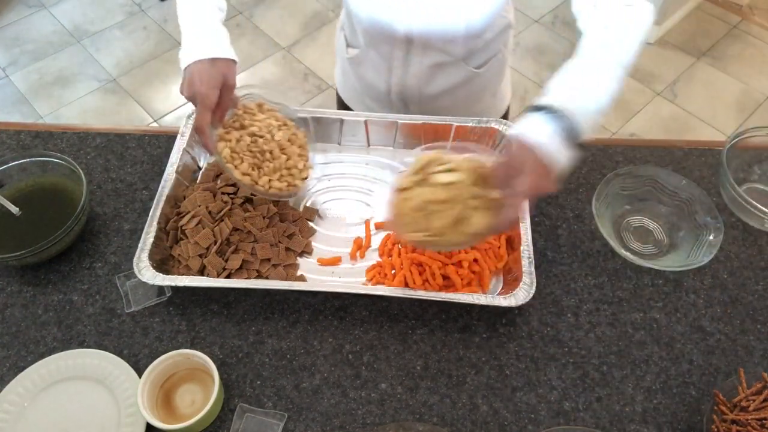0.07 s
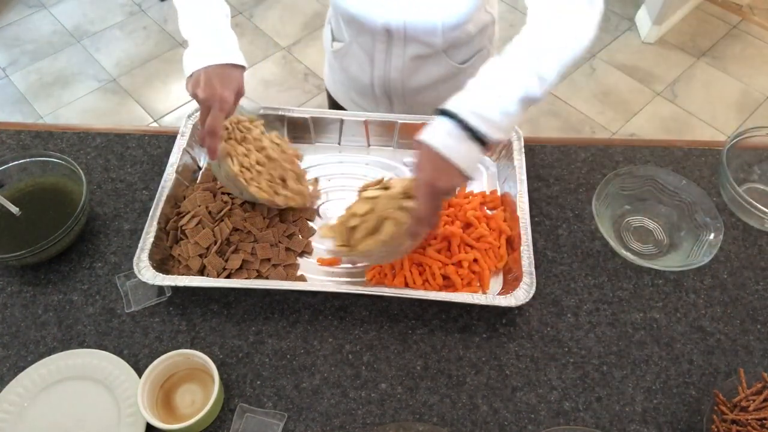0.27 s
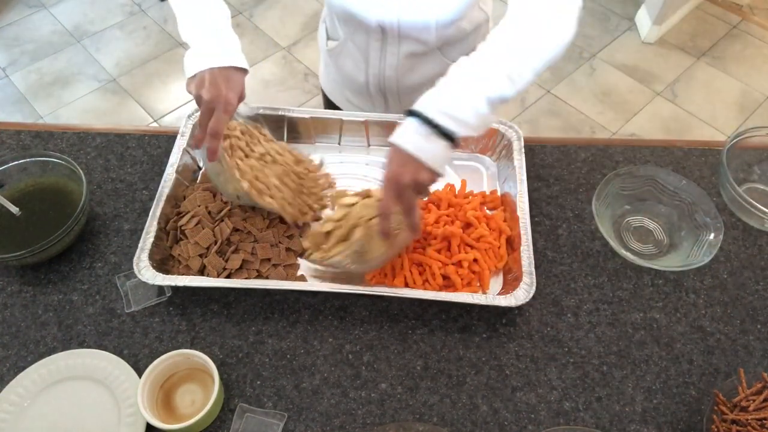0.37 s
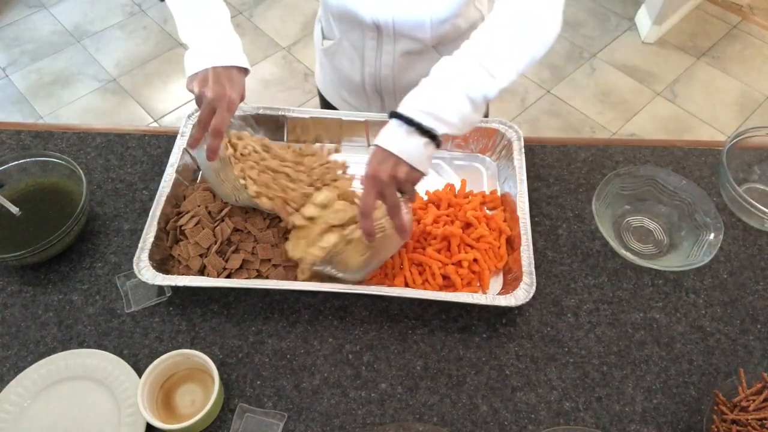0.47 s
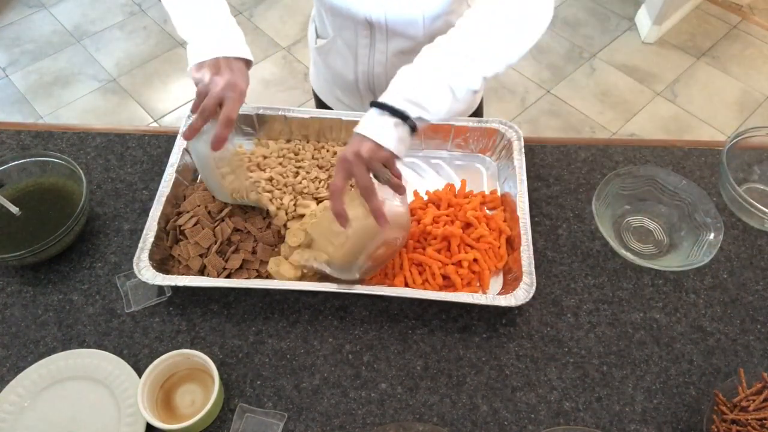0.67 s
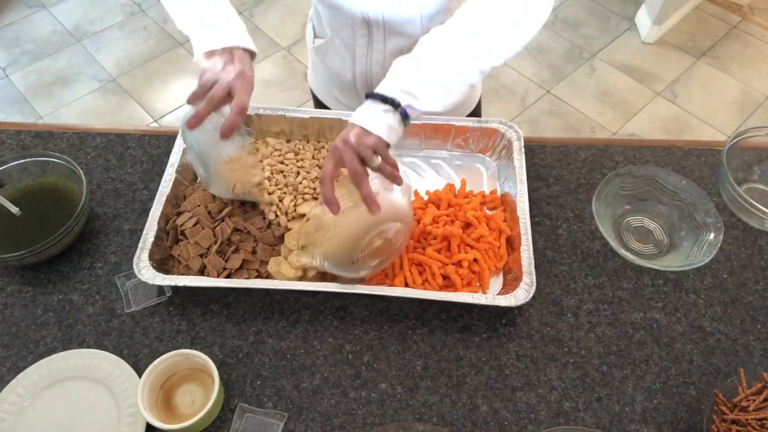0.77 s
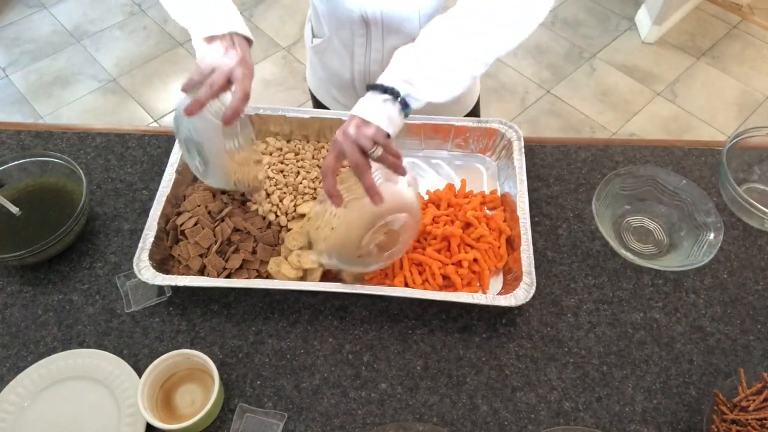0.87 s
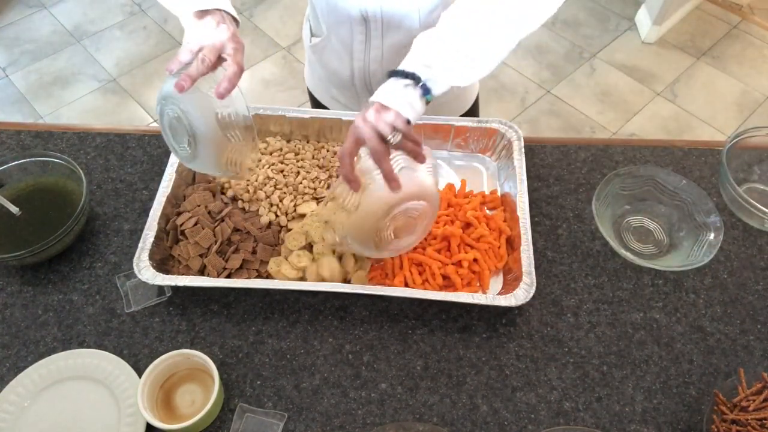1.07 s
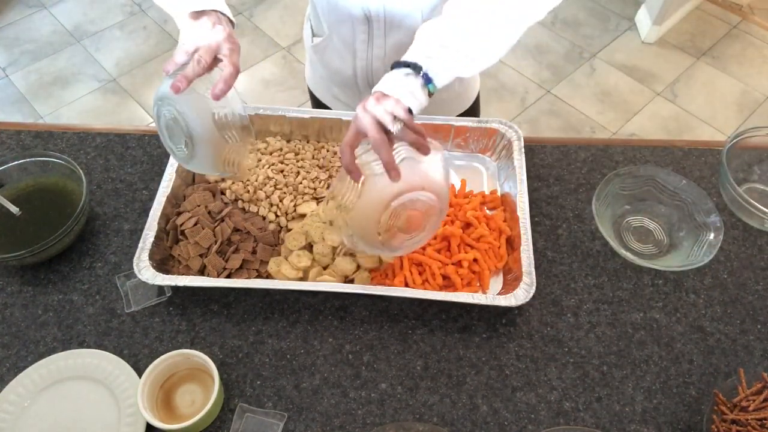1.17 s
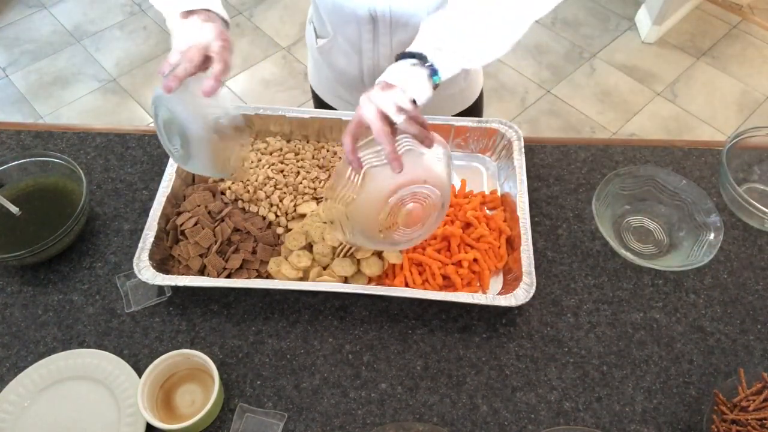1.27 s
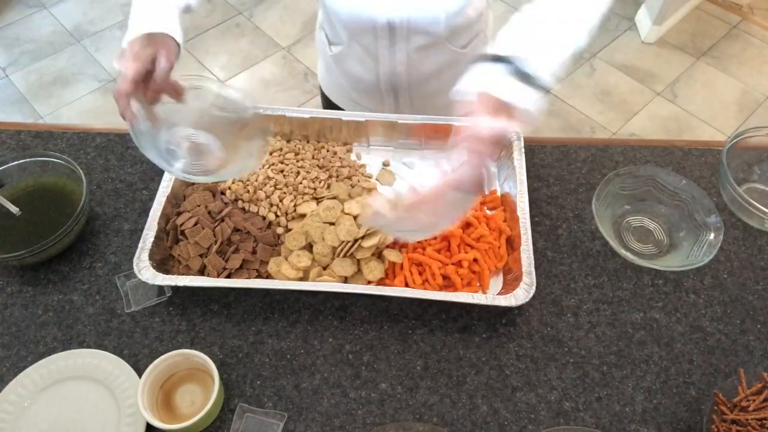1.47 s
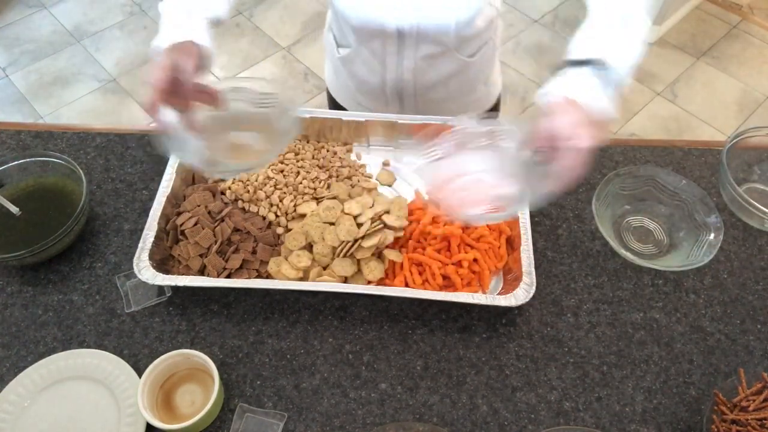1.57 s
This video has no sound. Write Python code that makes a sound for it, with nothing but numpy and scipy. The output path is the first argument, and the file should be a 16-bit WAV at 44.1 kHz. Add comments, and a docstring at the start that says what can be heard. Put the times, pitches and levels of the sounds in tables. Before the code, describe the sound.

Dry cereal and cracker pieces tick lightly on glass bowls, then dump in a loud, crackling rush into a foil pan, thinning to scattered knocks on the pile; close microphone in a hard-walled kitchen.

```python
"""Kitchen counter: dry snack pieces pour from glass bowls into a foil pan.
Pieces slide, knock and tick first: noise grains, short sine pairs and decaying glass modes.
The load crashes on foil, then thins out onto the pile: crackling noise bursts through foil, pile and
pan colours. Last lumps drop. Under it: puffs of treble crumbs, a low counter thrum,
a hard-walled kitchen's noise tails and a faint room hum."""
import sys
import numpy as np
from scipy import signal
from scipy.fft import rfft, irfft
from scipy.io import wavfile
from scipy.ndimage import uniform_filter1d

SR = 44100
rng = np.random.default_rng(int(sys.argv[2]) if len(sys.argv) > 2 else 0)


def wav_out(sig):
    """Save sig, one row per channel (or a flat mono array), as 16-bit PCM at SR to the path in sys.argv[1]."""
    wavfile.write(sys.argv[1], SR, np.round(np.clip(np.atleast_2d(sig).T, -1, 1) * 32767).astype(np.int16))


N = 70560

# room hum spectrum: [f/Hz, density/dB per Hz]
HUM_SPECTRUM = [(15, -41), (35, -29.5), (60, -6), (100, 1.3), (180, -13.5), (350, -9.5), (1170, -13),
                (2430, -24.5), (7390, -27), (16200, -34)]
# kitchen decay: [f/Hz, t60/s]
KITCHEN_DECAY = [(200, 0.14), (600, 0.95), (1400, 0.93), (3700, 0.63), (9700, 0.41), (16000, 0.33)]
# low counter modes: [f/Hz, width/Hz, level/dB]
COUNTER_MODES = [(65, 31, -6.5), (106, 12, 0.2), (151, 28, -6.5), (215, 95, -7)]
# pieces sliding in the tipped bowl: [t/s, level/dB]
SLIDE_LEVEL = [(0.038, -72.5), (.105, -68.5), (0.124, -53), (.165, -44), (0.201, -54)]
# crumbs, thin puffs of treble: [t/s, level/dB, centre f/Hz, t60/s]
CRUMB_PUFFS = [(0.0812, -44.5, 11400, 0.018), (.1216, -50, 12500, .012), (.1705, -50, 10460, .01),
               (0.6448, -31, 10930, 0.016), (0.671, -37, 10000, 0.0065), (1.2420, -62, 11100, .01),
               (1.2820, -52, 9800, .01), (1.426, -63.5, 10050, 0.01)]
# pieces ticking on the glass bowl: [t/s, level/dB, most excited f/Hz]
GLASS_TICKS = [(0.080, -50, 4020), (0.0875, -49.5, 4400), (0.1115, -31.5, 7040), (0.121, -34, 4880),
               (0.128, -29, 3620), (0.1408, -39, 6500), (0.1448, -34, 7330), (0.1535, -35, 5930),
               (0.1705, -37, 5520), (0.178, -37.5, 4410), (0.180, -31, 3000), (.195, -43.5, 5980)]
# bowl modes: [f/Hz, level/dB, t60/s]
GLASS_MODES = [(1540, -11, .02), (2610, -13, .022), (2960, -13, .022), (3015, -3, .034), (4370, -3, .026),
               (4415, 0, .03), (4510, -10, .022), (5230, -18, .03), (5900, -6, .034), (7320, -9, .022),
               (7390, -3, .024), (8400, -12, .036), (9020, -19, .022)]
# hard pieces knocking on each other: [t/s, level/dB, pitch f/Hz, t60/s]
CLACK_HITS = [(0.042, -61, 3960, .012), (.0722, -52, 3930, .006), (0.2033, -11.5, 3060, 0.012),
              (0.204, -22, 1490, 0.025), (.2255, -10.5, 2320, 0.016), (.2330, -11, 1520, 0.014),
              (0.258, -10.5, 1476, 0.03), (0.2632, -13, 3160, .012), (0.2734, -13.5, 2300, .012),
              (.313, -20, 3180, .012), (.3195, -15, 2310, 0.009), (.360, -12, 2210, 0.0096),
              (0.4212, -17, 2560, 0.017), (.4620, -13.5, 3600, .01), (.4765, -17, 3220, 0.0062),
              (0.5078, -13.5, 4124, 0.013), (0.5478, -23, 4096, 0.021), (0.6946, -27, 2670, 0.01),
              (0.713, -27, 2490, 0.0088), (0.749, -29, 2700, 0.0086), (0.758, -27.5, 4200, 0.012),
              (0.8457, -22.5, 1525, 0.014), (.9507, -27.5, 3720, 0.0062), (1.008, -26, 3700, 0.0056),
              (1.057, -32, 4470, 0.017), (1.1045, -26, 2330, 0.0075), (1.1305, -34.5, 5700, .012),
              (1.192, -31, 2094, 0.027), (1.193, -36, 1580, 0.037), (1.194, -38, 449, 0.057)]
# larger pieces landing: [t/s, level/dB, pitch f/Hz, treble/dB (flat at -20), t60/s]
DROP_HITS = [(0.201, -10.5, 1590, -21, 0.075), (0.213, -20, 1580, -6, 0.03),
             (0.225, -10, 2400, -20.5, 0.051), (0.235, -14, 1520, -30, 0.27),
             (0.274, -10, 2410, -9.5, 0.12), (0.289, -14, 3320, -36, 0.029),
             (0.295, -10.5, 2540, -21, 0.019), (0.314, -11.5, 3130, -29, 0.037),
             (0.329, -11, 1535, -27, 0.094), (0.346, -7.5, 1600, -21, 0.057),
             (0.36, -7.5, 1550, -11.5, 0.03), (0.384, -14, 2670, -13, 0.059),
             (0.419, -13, 2580, -18, 0.025), (0.435, -14, 2370, -22, 0.017),
             (0.461, -16, 3770, -17.5, 0.11), (0.475, -17, 960, -19, 0.083),
             (0.509, -23.5, 4250, -11, 0.049), (0.548, -17, 1880, -18.5, 0.17),
             (0.589, -19.5, 2150, -14, 0.071), (0.644, -27, 2030, -12, 0.028),
             (0.695, -19, 2800, -17.5, 0.035), (0.748, -21, 2770, -24, 0.04), (0.758, -24, 940, -19, 0.051),
             (0.845, -16.5, 1550, -23, 0.037), (0.852, -22.5, 990, -34, 0.037),
             (0.866, -25.5, 1880, -19, 0.06), (0.884, -19, 1120, -25.5, 0.041),
             (0.896, -27, 910, -29.5, 0.035), (0.92, -29.5, 880, -16.5, 0.073),
             (0.987, -24, 1200, -14, 0.075), (1.008, -29, 950, -25.5, 0.021), (1.047, -24, 960, -18, 0.073),
             (1.057, -21, 1140, -12.5, 0.1), (1.071, -23, 1510, -27, 0.075),
             (1.1043, -24.5, 2360, -17, 0.028), (1.13, -30, 1130, -18, 0.037),
             (1.191, -22, 2820, -16, 0.034), (1.1945, -22.5, 770, -30, 0.065),
             (1.217, -32, 774, -33, 0.057), (1.242, -40, 929, -7, 0.035), (1.287, -36, 855, -47, 0.049)]
# stream of small pieces: [t/s, level/dB, treble lift/dB, share on the pile/0-1]
POUR_COURSE = [(0.199, -27, 10, 0.13), (.222, -27.5, 2, 0.25), (0.252, -26, 4, 0.48), (0.266, -19, 2, 0.29),
               (.3, -19.5, 0, 0.2), (0.368, -20.5, 6, 0.38), (.4, -27.5, -10, 0.3),
               (0.461, -29.5, 1.5, 0.39), (.515, -28, -0.5, 0.38), (.535, -34.5, 2, 0.54),
               (.6, -33.5, 1.5, 0.42), (.68, -34.5, -0.5, 0.29), (.76, -38, -2, 0.58),
               (.83, -40.5, 3, 0.26), (.88, -38.5, 2, 0.82), (0.949, -44, 4.5, 0.62), (1.03, -44, 2, 0.81),
               (1.098, -49, 5, 0.98), (1.125, -44.5, 0, 0.98), (1.18, -50.5, 2, 0.65), (1.21, -54, 6, 1),
               (1.3, -64, -2, 0.95), (1.45, -74, -8, 0.99)]
# landing colour on foil, before the bare-floor resonance: [f/Hz, gain/dB]
FOIL_COLOUR = [(35, -58.5), (60, -34), (373, -29), (429, -24.5), (654, -11), (930, -4), (1520, -6),
               (1790, -8.5), (3070, -3), (6970, -13.5), (15100, -30), (16200, -33)]
# uncovered pan floor, one resonance: (f/Hz, width/Hz, gain/dB)
BARE_FLOOR = (1510, 90, 8.1)
# landing colour on the pile: [f/Hz, gain/dB]
PILE_COLOUR = [(35, -51), (60, -12.5), (302, -14), (439, -4), (518, -5), (1180, -4), (3140, -14.5),
               (4360, -7.5), (8610, -25), (12800, -20.5), (16200, -31.5)]
# broad pan resonances: [f/Hz, width/Hz, gain/dB]
PAN_RESONANCES = [(435.6, 30, 6), (937, 150, 2.5), (1520, 57, -2.5), (2250, 1100, 6), (2870, 73, -1),
                  (4200, 110, 1.3)]

HUM_DB = -69
WET_DB, WET_GAP_S, TAIL_TURN_HALF_CYCLES_PER_S = -9, 0.006, 9
THRUM_DB, THRUM_FOLLOW_EXPONENT, THRUM_LAG_S = -55, 0.54, 0.029
SLIPS_PER_S, SLIDE_TOP_HZ, SLIDE_DULL_DB = 1400, 2600, -9
TICK_RING_DB, TICK_CLICK_DB, TICK_SPREAD_DB = -5, -7, 2
TICK_FOCUS_DB = 6  # fall one octave from the excited region
TICK_RISE_S, TICK_CLICK_T20_S, TICK_ROUGHNESS = 0.0006, 0.003, 0.3
CLICK_LOW_HZ, CLICK_TOP_HZ = 900, 9300
CLACK_DETUNE, CLACK_PARTNER_GAIN, CLACK_RISE_S = 0.13, 0.37, 0.00062
SPIKE_DB, SNAP_DB, SNAP_T60_S, CRUNCH_RISE_S, RING_BANDWIDTH_RATIO = 3.5, -5.5, 0.0012, 0.0009, 0.18
DROP_RING_DB, DROP_CREST_DB = -14, 10
PIECES_PER_S, PIECE_SIZE_DB, GRAIN_KINDS = 2400, 2.5, 30
GRAIN_T60_S, GRAIN_RING_DB, TREBLE_HZ = 0.013, -9.5, 5000
BODY_HZ, BODY_START_DB, BODY_RISE_S = 1200, -6, 0.07
HITS_LOW_HZ, MIC_LOW_HZ, BAND_EDGE_HZ, CEILING = 239, 58, 15850, 0.45


def gain_of(db):
    """Amplitude gain from dB."""
    return 10 ** (np.asarray(db) / 20)


def evened(x):
    """Scales to rms 1."""
    return x / np.sqrt(np.mean(x ** 2) + 1e-20)


def read(points, hz):
    """Interpolates a table on a log-frequency axis."""
    f, value = np.transpose(points)
    return np.interp(np.log(hz + 1), np.log(f + 1), value)


def add(mix, t_s, sound):
    """Mixes a sound in at t_s, cut at the end of the mix."""
    part = mix[round(t_s * SR):][:len(sound)]
    part += sound[:len(part)]


def highpass(x, hz, order):
    """Butterworth highpass."""
    return signal.sosfilt(signal.butter(order, hz, "high", fs=SR, output="sos"), x)


def colour(x, shape_db):
    """Minimum-phase filter with the gain shape_db(hz)."""
    hz = abs(np.fft.fftfreq(4096, 1 / SR))
    log_gain = np.maximum(shape_db(hz), -100) * np.log(10) / 20
    spectrum = np.exp(np.conj(signal.hilbert(log_gain)))  # phase from log gain
    taps = np.fft.ifft(spectrum).real[:2048]
    return signal.oaconvolve(x, taps)[:len(x)]


def shaped_noise(gain):
    """Steady noise of rms 1 with the given gain per FFT bin."""
    return evened(irfft(rfft(rng.standard_normal(N)) * gain, N))


def hum():
    """Faint steady room noise, shaped by its spectrum."""
    hz = np.fft.rfftfreq(N, 1 / SR)
    return gain_of(HUM_DB) * shaped_noise(gain_of(read(HUM_SPECTRUM, hz)))


def kitchen(x):
    """Noise tails, each band dying at its own speed; three take turns so that hits ring differently."""
    out = np.zeros(N)
    turn = np.arange(N) / SR * TAIL_TURN_HALF_CYCLES_PER_S
    gap = np.zeros(round(WET_GAP_S * SR))
    for k in range(3):
        hz, t, bands = signal.stft(rng.standard_normal(SR), SR, nperseg=256)
        fall = gain_of(-60 * t / read(KITCHEN_DECAY, hz)[:, None])
        tail = signal.istft(bands * fall, SR, nperseg=256)[1]
        tail = np.r_[gap, tail / np.linalg.norm(tail)]
        feed = np.sqrt(2 / 3) * np.cos(np.pi * (turn + k / 3))  # the three powers sum to 1
        out += signal.fftconvolve(x * feed, tail)[:N]
    return out


def thrum(near):
    """The counter hums in a few low modes, loosely following the clatter's energy above it."""
    hz = np.fft.rfftfreq(N, 1 / SR)
    modes = sum(gain_of(db) / (1 + (2 * (hz - f) / width) ** 2) for f, width, db in COUNTER_MODES)
    lag = np.arange(N) / (THRUM_LAG_S * SR)
    energy = abs(signal.fftconvolve(near ** 2, lag * np.exp(-lag))[:N])
    follow = (energy / energy.max()) ** (THRUM_FOLLOW_EXPONENT / 2)
    return gain_of(THRUM_DB) * follow * shaped_noise(modes)


def slide():
    """Tiny scraping contacts in the bowl: random impulses excite a short noise grain."""
    slips = rng.standard_normal(N) * (rng.random(N) < SLIPS_PER_S / SR)
    scrape = rng.standard_normal(300) * gain_of(-np.arange(300) / 6)
    raw = signal.oaconvolve(slips, scrape)[:N]

    def shape_db(f):
        low_cut_db = -10 * np.log10(1 + (1400 / (f + 1)) ** 4)
        dull_db = SLIDE_DULL_DB / (1 + (SLIDE_TOP_HZ / (f + 1)) ** 4)
        return read(FOIL_COLOUR, f) + low_cut_db + dull_db

    t_s, db = np.transpose(SLIDE_LEVEL)
    level_db = np.interp(np.arange(N) / SR, t_s, db, left=-140, right=-140)
    return evened(colour(raw, shape_db)) * gain_of(level_db)


def crumbs():
    """Wide bands of treble noise that die at once."""
    out, t = np.zeros(N), np.arange(1000) / SR
    for t_s, db, hz, t60_s in CRUMB_PUFFS:
        sos = signal.butter(2, [0.8 * hz, 1.25 * hz], "band", fs=SR, output="sos")
        band = signal.sosfilt(sos, rng.standard_normal(1000))
        add(out, t_s, gain_of(db - 60 * t / t60_s) * evened(band) / 2)
    return out


def glass():
    """Each tick rings the bowl's modes in its own mix, chattering a little, with a dry click."""
    out, t = np.zeros(N), np.arange(2000) / SR
    hz, mode_db, t60_s = np.transpose(GLASS_MODES)[:, :, None]

    def click_db(f):
        top_db = -10 * np.log10(1 + (f / CLICK_TOP_HZ) ** 10)
        return top_db - 10 * np.log10(1 + (CLICK_LOW_HZ / (f + 1)) ** 6)

    for t_s, db, centre_hz in GLASS_TICKS:
        draw = rng.standard_normal((len(hz), 2 + len(t)))
        spread_db, phase, noise = TICK_SPREAD_DB * draw[:, :1], 2 * draw[:, 1:2], draw[:, 2:]
        focus_db = -TICK_FOCUS_DB * np.log2(hz / centre_hz) ** 2
        mix = gain_of(mode_db + focus_db + spread_db - 60 * t / t60_s)
        chatter = 1 + TICK_ROUGHNESS * evened(uniform_filter1d(noise, size=60, axis=1))
        modes = mix * chatter * np.sin(2 * np.pi * hz * t + phase)
        ring = np.minimum(t / TICK_RISE_S, 1) * modes.sum(0)
        click = colour(noise[0] * gain_of(-20 * t / TICK_CLICK_T20_S), click_db)
        click /= abs(click).max()
        add(out, t_s, gain_of(db + TICK_RING_DB) * ring + gain_of(db + TICK_CLICK_DB) * click)
    return out


def clacks():
    """Pieces knock on each other: a sine and a weaker detuned partner, quickly dying."""
    out, t = np.zeros(N), np.arange(1500) / SR
    for t_s, db, hz, t60_s in CLACK_HITS:
        detune, phase = rng.standard_normal(2)
        partner = np.sin(2 * np.pi * hz * (1 + CLACK_DETUNE * detune) * t + phase)
        pair = np.sin(2 * np.pi * hz * t) + CLACK_PARTNER_GAIN * partner
        add(out, t_s, gain_of(db - 60 * t / t60_s) * np.minimum(t / CLACK_RISE_S, 1) * pair)
    return out


def pan_db(hz):
    """Broad resonances of the pan."""
    return sum(db / (1 + (2 * (hz - f) / width) ** 2) for f, width, db in PAN_RESONANCES)


def foil_db(hz):
    """Colour of bare foil, with the uncovered floor's resonance."""
    f, width, db = BARE_FLOOR
    return read(FOIL_COLOUR, hz) + db / (1 + (2 * (hz - f) / width) ** 2)


def crunch(noise, hz, t60_s, ring_db):
    """One landing: a snap, then a dying, spiky crackle with a ring near its own pitch."""
    t = np.arange(len(noise)) / SR
    spikes = evened(uniform_filter1d(noise[::-1], size=30))
    crackle = evened(noise * gain_of(SPIKE_DB * spikes))
    b, a = signal.iirpeak(hz, 1 / RING_BANDWIDTH_RATIO, SR)
    both = crackle + gain_of(ring_db) * evened(signal.lfilter(b, a, crackle))
    fall = gain_of(-60 * t / t60_s) + gain_of(SNAP_DB - 60 * t / SNAP_T60_S)
    return evened(both) * np.minimum(t / CRUNCH_RISE_S, 1) * fall


def drops():
    """Larger pieces: crunches coloured by foil and pile in the pour's share at that time."""
    out = np.zeros(N)
    pour_t_s, _, _, pile_share = np.transpose(POUR_COURSE)
    for t_s, db, hz, treble_db, t60_s in DROP_HITS:
        on_pile = np.interp(t_s, pour_t_s, pile_share)

        def shape_db(f):
            surface_db = (1 - on_pile) * foil_db(f) + on_pile * read(PILE_COLOUR, f)
            return surface_db + pan_db(f) + (treble_db + 20) / (1 + (TREBLE_HZ / (f + 1)) ** 4)

        hit = colour(crunch(rng.standard_normal(3000), hz, t60_s, DROP_RING_DB), shape_db)
        loudest_rms = np.sqrt(np.max(uniform_filter1d(hit ** 2, size=100)))
        add(out, t_s, gain_of(db - DROP_CREST_DB) * hit / loudest_rms)
    return out


def stream():
    """Many small landings of random size and pitch, on foil or pile, in the pour's level."""
    t = np.arange(N) / SR
    pour_t_s, level_db, lift_db, pile_share = np.transpose(POUR_COURSE)
    size = gain_of(PIECE_SIZE_DB * np.minimum(rng.exponential(1, N), 4))
    landings = size * (rng.random(N) < PIECES_PER_S / SR)
    kind, raw = rng.integers(0, GRAIN_KINDS, N), np.zeros(N)
    for k, hz in enumerate(np.geomspace(700, 9000, GRAIN_KINDS)):
        noise = rng.standard_normal(1500)
        grain = crunch(noise, hz, GRAIN_T60_S * rng.uniform(0.65, 1.64), GRAIN_RING_DB)
        raw += signal.oaconvolve(landings * (kind == k), grain)[:N]
    on_foil = evened(colour(raw, lambda f: foil_db(f) + pan_db(f)))
    on_pile = evened(colour(raw, lambda f: read(PILE_COLOUR, f) + pan_db(f)))
    share = np.interp(t, pour_t_s, pile_share)
    pour = (1 - share) * on_foil + share * on_pile
    lift = gain_of(np.interp(t, pour_t_s, lift_db)) - 1
    pour = pour + lift * highpass(pour, TREBLE_HZ, 2)
    started = t > DROP_HITS[0][0]  # silent until the first larger piece
    return pour * started * gain_of(np.interp(t, pour_t_s, level_db, right=-140))


def scene():
    """All sources in the kitchen; the light pan radiates little bass, and less while still empty."""
    load = stream() + drops() + clacks()
    body = signal.filtfilt(*signal.butter(2, BODY_HZ, fs=SR), load)
    filled = np.clip((np.arange(N) / SR - DROP_HITS[0][0]) / BODY_RISE_S, 0, 1)
    load = load + (gain_of(BODY_START_DB * (1 - filled)) - 1) * body
    near = highpass(glass() + slide() + crumbs() + load, HITS_LOW_HZ, 3)
    return (near + gain_of(WET_DB) * kitchen(near) + thrum(near) + hum())[None]


def record(dry):
    """Peaks round off softly; the microphone drops the deepest bass; then the band limit."""
    rounded = CEILING * np.tanh(dry / CEILING)
    lean = highpass(rounded, MIC_LOW_HZ, 3)
    taps = signal.firwin(511, BAND_EDGE_HZ, window=("kaiser", 9), fs=SR)
    return signal.oaconvolve(lean, taps[None], "same")


dry = scene()
out = record(dry)
wav_out(out)
```